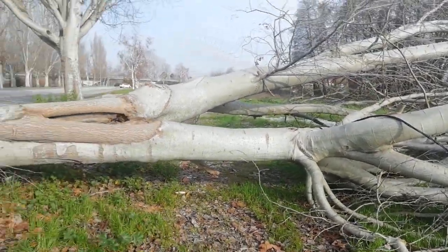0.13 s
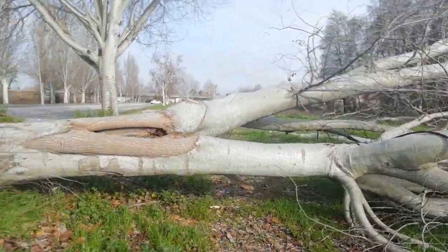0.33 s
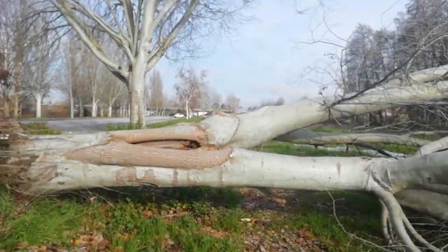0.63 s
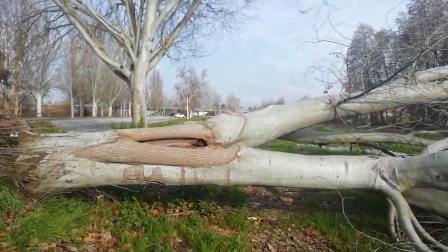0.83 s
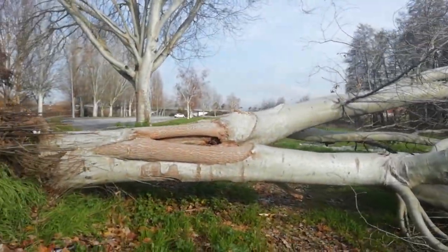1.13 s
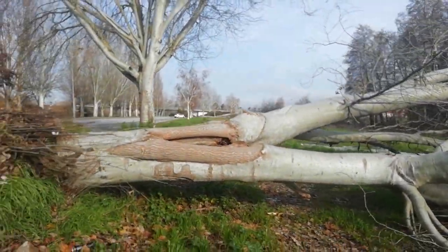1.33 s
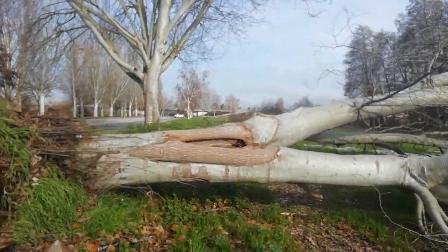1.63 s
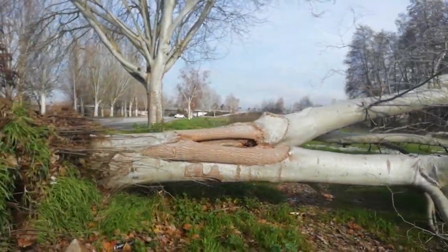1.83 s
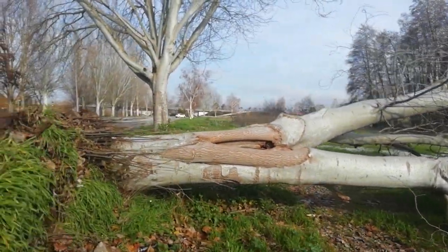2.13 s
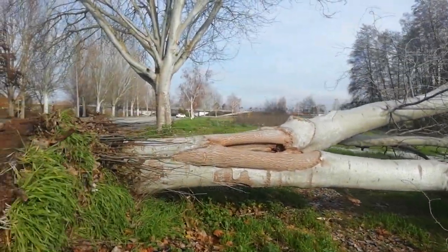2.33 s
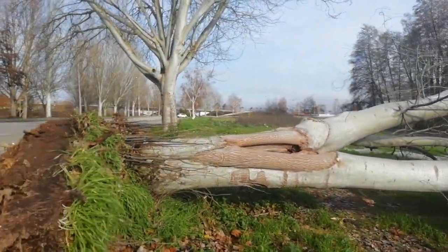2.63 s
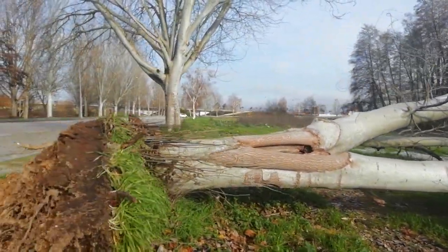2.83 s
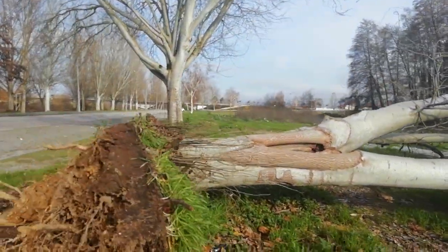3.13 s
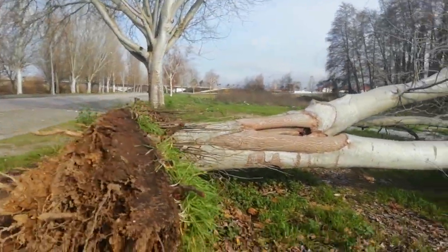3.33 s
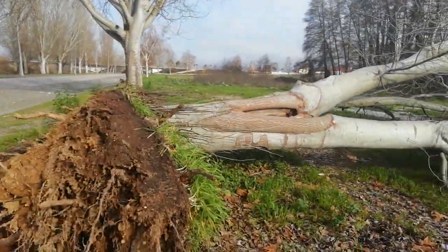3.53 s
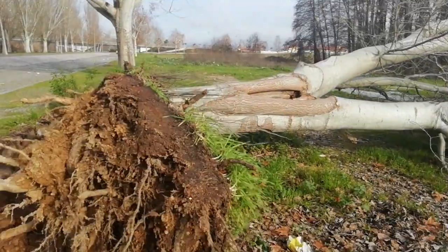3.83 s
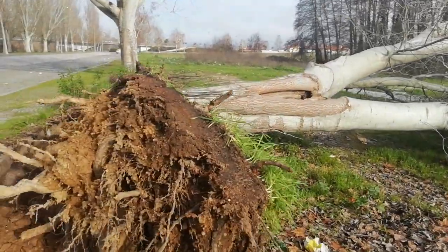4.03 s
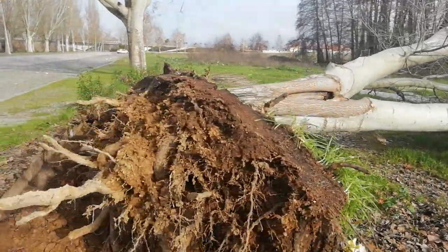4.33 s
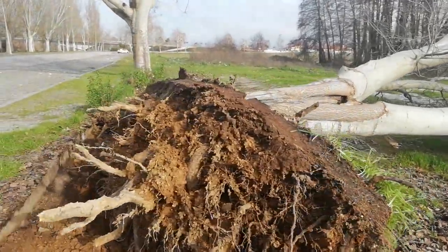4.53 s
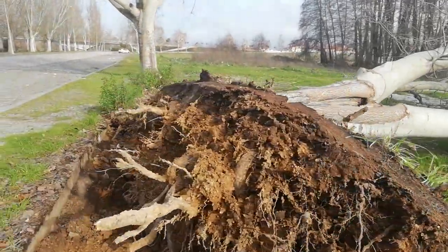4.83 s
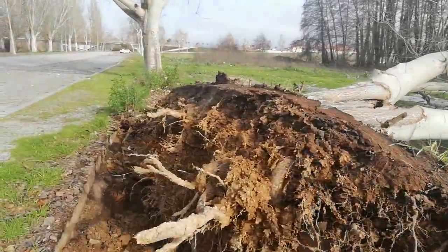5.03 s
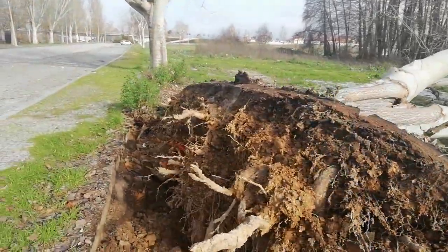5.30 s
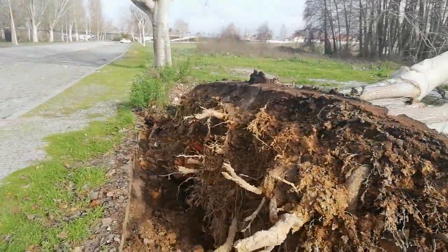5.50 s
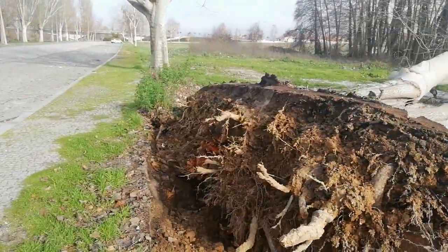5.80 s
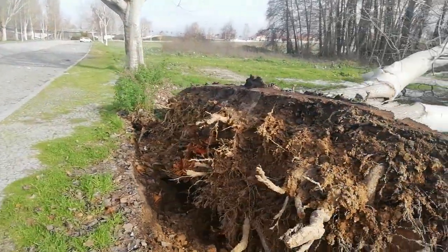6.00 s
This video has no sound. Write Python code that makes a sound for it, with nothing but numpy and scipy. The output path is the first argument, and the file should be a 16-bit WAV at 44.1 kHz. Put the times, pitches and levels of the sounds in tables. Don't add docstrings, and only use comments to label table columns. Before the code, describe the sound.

Close, crisp footsteps crackle through leaf litter and small twigs, growing stronger, over a quiet open background of thin leaf hiss and far traffic.

```python
import sys
import numpy as np
from scipy import signal
from scipy.io import wavfile
from scipy.ndimage import uniform_filter1d

SR = 44100
rng = np.random.default_rng(int(sys.argv[2]) if len(sys.argv) > 2 else 0)


def ratio_of_db(decibels):
    return 10 ** (np.asarray(decibels, float) / 20)


def unload_audio(sound):
    columns = np.transpose(np.atleast_2d(sound))
    steps = np.round(np.clip(columns, -1, 1) * 32767)
    wavfile.write(sys.argv[1], SR, steps.astype(np.int16))


N = 271656
COARSE_S = np.arange(0, N + 20, 20) / SR


def crunch(per_s=7000, spread_db=3.6, clump_db=1.0):
    leaf_db, stem_db, grit_db = tread()
    soil_db, pan_db = heels()
    born = rng.random(N) < per_s / SR
    size_db = spread_db * np.minimum(rng.exponential(1, N), 2.8) + clump_db * drift(40)
    size_db -= 20 * np.log10(np.sqrt(np.mean(born * ratio_of_db(size_db) ** 2)))
    at = np.flatnonzero(born)
    zone_db = [(level_db + size_db - 3.0)[at] for level_db in (soil_db, grit_db, stem_db, leaf_db)]
    return breaks(at, zone_db, pan_db[at], colour_db=4.0, scatter=1.1, patch_db=2.5)


# (peak time [s], leaf crackle level [dB], rise [s], fall [s], grit above the leaves [dB])
PRESSES = [(0.176, -38, .008, 0.3, -7.5), (0.23, -43, 0.085, 0.092, -6),
           (1.103, -29.5, 0.068, 0.091, -11.5), (1.852, -47.5, 0.013, 0.23, 11),
           (1.905, -34.5, 0.073, 0.1, -12), (1.954, -35, 0.025, 0.26, -13.5),
           (2.754, -35.5, 0.044, 0.14, -9.5), (2.793, -33, 0.032, 0.045, -5),
           (2.862, -32, 0.022, 0.073, -9.5), (2.934, -36, 0.021, 0.13, -15),
           (3.538, -33.5, 0.085, 0.066, -9.5), (4.2, -29.5, 0.034, 0.12, -12.5),
           (4.214, -26.5, 0.028, 0.078, -23.5), (4.813, -29, .017, 0.054, -12.5),
           (4.925, -25, 0.052, 0.074, -5.5), (5.557, -29, 0.014, 0.14, -8.5)]
# (peak time [s], leaf crackle level [dB], rise [s], fall [s], grit above the leaves [dB])
SCUFFS = [(0.34, -77, .03, 0.37, -22), (1.44, -35.5, 0.046, 0.27, -15.5), (1.51, -48, 0.12, 0.098, -13),
          (1.781, -44.5, 0.036, 0.056, -12.5), (2.262, -42.5, 0.23, 0.096, -9.5),
          (2.544, -52, .01, 0.14, -25), (2.592, -45.5, 0.016, 0.47, -16), (3.391, -46.5, 0.008, 0.083, -12),
          (3.48, -51, 0.04, 0.11, 6.5), (3.627, -43.5, 0.046, 0.067, -10), (3.763, -49, 0.14, 0.055, -11.5),
          (4.102, -60, 0.032, 0.17, 1.5), (4.579, -35, 0.012, 0.07, -26), (4.633, -31, 0.029, 0.02, -12),
          (4.669, -45.5, 0.045, 0.062, -7.5), (4.764, -44.5, 0.0071, 0.017, -4),
          (5.184, -39, 0.086, 0.014, -12), (5.256, -47, 0.0041, 0.015, -39),
          (5.93, -42, 0.049, 0.031, -13.5), (6.052, -53, 0.22, 0.1, -9)]
# (start [s], stop [s], last level [dB], swell [dB], grit above the leaves [dB])
DRAGS = [(0.0, 0.144, -66.5, -8, -4), (0.503, 0.684, -54, 12, -8), (1.228, 1.413, -54, -11.5, -12),
         (1.675, 1.829, -56, 0, -23), (1.99, 2.082, -41.5, -0.5, -16.5), (2.374, 2.52, -59.5, -4, -8.5),
         (2.966, 3.065, -45, -10, -16.5), (3.09, 3.178, -47, 0.5, -15), (3.2, 3.377, -62, -8, -8),
         (5.01, 5.11, -45, -1.5, -10.5), (4.323, 4.504, -42.5, -0.5, -14.5), (4.525, 4.552, -59, 2, -15),
         (5.289, 5.508, -56, 1, -9), (5.693, 5.807, -41, 6, -6), (5.82, 5.901, -48.5, -9, -13)]
DRAG_EDGE_S = 0.021
REST_DB, REST_GRIT_DB = -71.5, 4
STEM_DB, STEM_FOLLOWS_GRIT, STEM_FOLLOWS_LEAF = -7, 0.29, 0.012


def tread():
    t = COARSE_S
    moves = []
    for s, level_db, rise_s, fall_s, grit_db in PRESSES + SCUFFS:
        moves.append((peak(s, level_db, rise_s, fall_s), level_db, grit_db))
    for start, stop, last_db, swell_db, grit_db in DRAGS:
        edges = np.minimum(0, 20 * np.minimum(t - start, stop - t) / DRAG_EDGE_S)
        slope = np.interp(t, [start, stop], [last_db - swell_db, last_db])
        moves.append((slope + edges, last_db, grit_db))
    moves.append((np.full(len(t), REST_DB), REST_DB, REST_GRIT_DB))

    power = np.zeros((3, len(t)))
    for leaf_db, top_db, grit_db in moves:
        stem_db = STEM_DB + STEM_FOLLOWS_GRIT * (grit_db + 8.5) + STEM_FOLLOWS_LEAF * (top_db + 28)
        power += ratio_of_db(2 * leaf_db) * ratio_of_db([[0], [2 * stem_db], [2 * grit_db]])
    return [power_db(zone) for zone in power]


# (time [s], soil level [dB], fall [s], left-right at landing [dB], left-right at lift-off [dB])
HEELS = [
    (0.22, -64, 0.25, 5.5, 3),
    (1.07, -60, 0.43, 5, -1),
    (1.879, -49, 0.29, 2.5, 6),
    (2.24, -59.5, 0.081, -9, 2),
    (2.8, -59.5, 0.6, 3.5, -7.5),
    (3.53, -47, 0.14, 6.5, -2),
    (4.24, -53, 0.36, 4.5, -10),
    (4.64, -53.5, 0.14, -5.5, 4),
    (4.92, -46.5, 0.14, 6, -3.5),
    (5.6, -59.5, 0.98, 4, -13.5),
]
HEEL_RISE_S, LIFT_AFTER_S, REST_SOIL_DB = 0.11, 0.36, -64


def heels():
    power = ratio_of_db(2 * REST_SOIL_DB)
    sway = []
    for s, soil_db, fall_s, land_db, lift_db in HEELS:
        power = power + ratio_of_db(2 * peak(s, soil_db, HEEL_RISE_S, fall_s))
        sway += [(s, land_db), (s + LIFT_AFTER_S, lift_db)]
    sway.sort()
    return power_db(power), in_time(sway)


def peak(s, level_db, rise_s, fall_s):
    t = COARSE_S - s
    return level_db + 20 * np.minimum(t / max(rise_s, .002), -t / max(fall_s, .002))


def power_db(power):
    return np.interp(np.arange(N) / SR, COARSE_S, 10 * np.log10(power))


ZONES_HZ = [600, 1900, 3900, 7500]
# (frequency [Hz], level per Hz [dB])
LITTER = [(150, 19.5), (300, 11.5), (600, 10), (1200, 15.5), (2000, 11), (4000, 12), (6500, 5),
          (10000, -4.5), (15000, -13.5)]
# (frequency [Hz], share [0-1])
SAME_PATH = [(300, 0.99), (1500, 0.61), (4000, 0.69), (8000, 0.05)]
# (frequency [Hz], left-right [dB])
SHADOW = [(300, -0.5), (1200, 0), (4000, -4.5), (8000, -2.5), (13000, -7)]


def breaks(at, zone_db, pan_db, colour_db, scatter, patch_db, whole=False):
    where = arrival(at)
    side = np.array([[1], [-1]]) / 2
    out = np.zeros((2, N))
    for band, (hz, sos) in enumerate(bands(150, 14, 1 / 2)):
        place = np.interp(np.log(hz), np.log(ZONES_HZ), [0, 1, 2, 3])
        level_db = sum(max(0, 1 - abs(place - k)) * zone_db[k] for k in range(4))
        level_db = level_db + patch_db * drift(14.6)[at]
        draw = rng.standard_normal((len(at), 5)).T
        left_right_db = pan_db * place / 3 + at_hz(SHADOW, hz)
        size = ratio_of_db(level_db + at_hz(LITTER, hz) + colour_db * draw[0] + side * left_right_db)
        sign = (-1) ** band if whole else np.sign(draw[1])
        apart = np.clip(scatter * (1 - at_hz(SAME_PATH, hz)), 0, 1)
        strength = size * (np.sqrt(1 - apart) * sign + np.sqrt(apart) * draw[2:4])
        late = 0 if whole else (np.abs(draw[4]) * .0004 * SR).astype(int)
        clicks = [np.bincount(np.minimum(w + late, N - 1), s, N) for w, s in zip(where, strength)]
        out += signal.sosfilt(sos, np.array(clicks) + 1e-18)
    return out


# (from time [s], delay of the left port [samples])
FOOT = [
    (0, -4),
    (1.3, 4),
    (1.75, -4),
    (2.5, 5),
    (3.35, -4),
    (4.3, 6),
    (4.75, -5),
    (5.68, 6),
]


def arrival(at):
    foot = np.array(FOOT)
    step = np.searchsorted(foot[:, 0] * SR, at, "right") - 1
    lag = foot[step, 1].astype(int)
    return np.clip([at + lag, at], 0, N - 1)


def snaps(rows, tear_s=.0011, fade_db=1.5):
    s, peak_db, pan_db = np.repeat(rows, 4, axis=0).T
    order = np.tile(np.arange(4), len(s) // 4)
    s = s + tear_s * rng.random(len(s)) * order
    peak_db = peak_db - 1.5 - (order > 0) * 2.0 - fade_db * order
    zone_db = [peak_db - 20.0, peak_db - 21.0, peak_db - 12.5, peak_db + 2.0]
    return breaks((s * SR).astype(int), zone_db, pan_db, colour_db=1.5, scatter=.08, patch_db=0, whole=True)


# (time [s], peak level [dB], left-right [dB])
PLANT_SNAPS = [(0.1715, -18, 7), (0.2314, -18, 2), (0.2404, -15.5, 5), (0.2874, -18.5, 11), (0.3037, -20, -5),
               (1.041, -21, 9), (1.4283, -24, -11), (1.4916, -21, 1), (1.9094, -32, 1), (1.9546, -16, 5),
               (1.9982, -13.5, 8), (2.0663, -19.5, 7), (2.7423, -19, 8), (2.7812, -20, 7), (2.7927, -15, 4),
               (2.855, -21, -7), (2.861, -25, 10), (2.879, -18, 17), (2.9329, -19, -22), (2.9708, -22.5, -23),
               (3.527, -25, 1), (3.5395, -18.5, 27.5), (4.1847, -19, 4), (4.2002, -14, 3), (4.6337, -16, 13),
               (4.8098, -19, 5), (4.9056, -16, -12), (4.929, -20, 22), (4.9769, -19, -13), (5.1809, -25, -16),
               (0.0167, -39.5, -14), (0.083, -29, -8), (0.323, -26, 4), (0.3532, -30, 18), (0.4424, -32, 1),
         (1.6748, -32.5, -18), (2.247, -29, -15), (2.376, -32, 3), (2.546, -30, 16), (2.576, -31, -13),
         (2.5901, -20.5, 14), (2.7138, -18, 4), (3.055, -26, 8), (3.0968, -21, 9), (3.1397, -25.5, 17),
         (3.17, -27, -4), (3.2259, -31, -11), (3.3953, -29.5, -5), (4.106, -30.5, -12), (4.1345, -29.5, -4),
         (4.3195, -27, 11), (4.3398, -23, 8), (4.3943, -15, 20), (4.4084, -24, -30), (4.5785, -23, -19),
         (4.608, -21, -8), (4.7658, -22.5, -2), (5.2563, -19.5, 7), (5.919, -27, -16), (6.0011, -37, -11),
               (0.0667, -56, -18), (0.192, -24, 9), (0.2694, -31, 7), (0.394, -39, 7), (0.4843, -33.5, 9),
          (1.063, -25, 1), (1.2156, -32, -1), (1.3085, -25, -1), (1.5412, -26, -14), (1.776, -37, 2),
          (1.8694, -22, 5), (1.8964, -30, 7), (2.222, -33, -12), (2.482, -32.5, 8), (2.5623, -30, -4),
          (2.6114, -45, -2.1), (2.6934, -31, -2.5), (3.4754, -29, 5), (3.5665, -18.5, -3), (3.758, -28, 2),
          (3.96, -44, 3), (4.369, -29, 10), (4.4962, -22, -13), (4.6214, -30, .1), (4.8271, -13, 7),
          (5.08, -33, -6), (5.217, -30, -4), (5.3154, -35, -22), (5.7222, -27, 6), (5.9344, -30, -14),
               (0.0924, -50, -1.5), (0.2074, -20, 3.5), (0.2182, -21, 1.0), (0.2226, -19.5, 4),
         (0.2544, -23, 1.0), (1.0236, -36, 3.5), (1.0737, -23, 3.5), (1.0884, -29, 2.0), (1.4282, -34, 0),
         (1.4584, -19, 2), (1.5024, -25, -3.5), (1.5223, -30, -9), (1.5474, -28, -8), (1.5924, -31, -11),
         (1.8492, -38, 0.0), (1.9234, -33, 0.5), (2.0744, -30, 3), (2.162, -37, -2.5), (2.745, -22, -1.0),
         (2.7514, -23, -3), (2.8366, -27, 2), (2.9087, -27, -8), (3.2144, -35, 1), (3.509, -29, 4.5),
         (3.59, -30, 0.0), (4.179, -22, -4), (4.5705, -24, -6), (4.592, -27, -8.0), (4.666, -32, -3.5),
         (4.806, -27, 3.0), (4.8094, -13.5, 1.5), (4.8175, -12.5, 4), (4.883, -25, 0.5),
         (5.1055, -40, -4.5), (5.1447, -44, -11), (5.55, -17, 6), (5.5618, -18, 2), (5.5744, -22, -1.0),
         (5.6241, -22, -2.0), (5.6885, -33, 1), (5.7622, -38, -6), (5.782, -32, -5)]


def twigs_and_husks():
    return snaps(PLANT_SNAPS)


# (time [s], peak level [dB], left-right [dB])
STALKS = [(2.5172, -44, 0.0), (2.5462, -30, -2), (2.5524, -32, -2.0), (2.5624, -34, -2.5),
          (2.59, -25, -0.5), (2.651, -32, -3.0), (2.6704, -33, -3.5), (2.714, -28, -3.0),
          (2.7815, -17, -0.5), (2.855, -15, 1.0), (2.9483, -25, -3), (3.7984, -51, -3.5),
          (3.912, -42, -5.0), (3.9694, -48, 1.5), (4.0048, -41, -0.5), (4.1154, -37, -1.5),
          (4.2794, -24, -1.0), (4.4144, -28, -4.0), (5.2562, -25, 0.5), (5.3605, -32, -2.5),
          (5.4246, -47, 1), (5.5099, -49, -3.5)]


def stalks():
    return ratio_of_db(-3.0) * signal.lfilter([1, -2, 1], [1], snaps(STALKS, tear_s=.0003, fade_db=3.0))


# (time [s], peak level [dB], ring [Hz])
KNOCKS = [(0.172, -44, 1950), (0.193, -43, 1820), (0.324, -29.5, 2710), (1.841, -39, 1900),
          (1.8536, -29.5, 2070), (1.869, -29.5, 2880), (0.084, -46.5, 2720), (1.886, -33, 3200),
          (2.377, -40, 3640), (2.7926, -44, 4500), (2.7934, -29.5, 2600), (2.931, -40, 3200),
          (3.0512, -37, 3280), (3.098, -34, 3100), (3.124, -50, 2900), (3.166, -44, 2740),
          (3.216, -44, 3240), (3.228, -45, 3180), (3.3945, -38, 3400), (4.172, -39, 3170),
          (4.2017, -43, 3760), (4.577, -39, 4400), (4.58, -29, 4380), (4.807, -39, 1590),
          (4.8098, -35.5, 1920), (4.882, -46, 3340), (4.9052, -26, 3330), (5.5543, -41, 2000),
          (5.92, -34, 4130)]


def knocks(cycles=7.0):
    out = np.zeros((2, N + 800))
    t = np.arange(800) / SR
    starts = arrival((np.array(KNOCKS)[:, 0] * SR).astype(int)).T
    for (s, peak_db, hz), (left, right) in zip(KNOCKS, starts):
        modes = np.sin(2 * np.pi * hz * t) + 0.39 * np.sin(2 * np.pi * 1.184 * hz * t)
        onset = np.minimum(t * hz, 1)
        ring = ratio_of_db(peak_db + 14.5 - 60 * t * hz / cycles / 2) * modes * onset
        out[0, left:left + len(t)] += ratio_of_db(-5.5) * ring
        out[1, right:right + len(t)] += ring
    return out[:, :N]


# (start [s], stop [s], first pitch [Hz], last pitch [Hz], level [dB])
GRINDS = [(.19, .27, 3300, 3000, -43.5), (1.07, 1.103, 3100, 3230, -43), (1.438, 1.469, 3200, 3440, -43),
          (1.489, 1.51, 3100, 2960, -41.5), (1.514, 1.552, 3200, 2900, -48.5),
          (1.72, 1.771, 2400, 2570, -53), (1.853, 1.889, 2300, 2690, -38),
          (1.891, 1.927, 2500, 2210, -37.5), (3.045, 3.075, 3200, 3220, -44.5),
          (3.101, 3.185, 3100, 3080, -49), (3.2, 3.246, 3200, 3170, -56), (4.562, 4.602, 4400, 4200, -43),
          (4.6, 4.645, 3900, 1800, -44), (4.166, 4.25, 4340, 3760, -54), (1.846, 1.962, 1000, 802, -52.5),
          (4.9, 4.971, 1500, 1408, -46), (1.86, 1.981, 502, 401, -54), (4.65, 4.679, 2500, 3600, -46),
          (4.699, 4.76, 3400, 3370, -58), (5.548, 5.608, 2000, 2300, -41), (5.838, 5.869, 3700, 3590, -40),
          (5.907, 5.944, 4100, 3860, -46)]
GRIND_WIDTH, GRIND_EDGE_S, GRIND_LEFT_DB = 0.23, 0.0037, -11.5


def grinds(per_s=2500, spread_db=4.0):
    out = np.zeros((2, N + 64))
    slipping = rng.random(N) < per_s / SR
    slip_size = ratio_of_db(spread_db * np.minimum(rng.exponential(1, N), 3))
    slips = slipping * rng.choice([-1, 1], N) * slip_size
    for start, stop, first_hz, last_hz, level_db in GRINDS:
        first, last = int(start * SR), int(stop * SR)
        t = np.arange(last - first) / SR
        wide_hz = np.clip(GRIND_WIDTH * (first_hz + last_hz) / 4, 50, 2000)
        rough = signal.sosfilt(signal.butter(2, wide_hz, fs=SR, output="sos"), slips[first:last])
        carrier = np.sin(2 * np.pi * np.cumsum(np.geomspace(first_hz, last_hz, len(t))) / SR)
        edge = np.minimum(1, np.minimum(t, t[::-1]) / GRIND_EDGE_S)
        sound = ratio_of_db(level_db) * edge * rms_one(rough * carrier)
        left, right = arrival(np.array([first]))[:, 0]
        out[0, left:left + len(t)] += ratio_of_db(GRIND_LEFT_DB) * sound
        out[1, right:right + len(t)] += sound
    return out[:, :N]


# (time [s], pitch [Hz], level [dB])
CHIPS = [
    [(.915, 8100, -78), (.93, 8000, -65), (.955, 8050, -84), (.965, 7800, -80), (.98, 7100, -78)],
    [(1.345, 6800, -47), (1.355, 7600, -42), (1.366, 8000, -39.5), (1.373, 7400, -48), (1.383, 6500, -43),
     (1.397, 7100, -44), (1.408, 7100, -66)],
    [(3.834, 6700, -74), (3.843, 8100, -50), (3.852, 8750, -48), (3.858, 8000, -52), (3.865, 7200, -45),
     (3.873, 7600, -64), (3.881, 8000, -42.5), (3.89, 7500, -60), (3.9, 7800, -73)],
]


def bird():
    call, t = np.zeros(N), np.arange(N) / SR
    for rows in CHIPS:
        s, hz, level_db = np.transpose(rows)
        sounding = (t > s[0]) & (t < s[-1])
        pitch = uniform_filter1d(np.interp(t, s, hz), size=220)
        call += sounding * ratio_of_db(np.interp(t, s, level_db)) * np.sin(2 * np.pi * np.cumsum(pitch) / SR)
    trees = rng.standard_normal((2, 12000)) * ratio_of_db(-60 * np.arange(12000) / SR / .2)
    echo = np.array([signal.fftconvolve(call, r)[:N] for r in trees])
    return call * ratio_of_db([[-12], [-3]]) + ratio_of_db(-38) * echo


# (frequency [Hz], level per Hz [dB])
LEAF_HISS = [(2500, -4.5), (4500, -11), (7000, -9.5), (10000, -18.5), (15500, -10)]


def far_leaves():
    return ratio_of_db(-70.0) * banded_noise(LEAF_HISS, patchy_db=2.5)


# (frequency [Hz], level per Hz [dB])
ROAD = [(15, -42), (25, -8.5), (53, 4.5), (155, -9), (197, -16), (240, -9), (261, -22), (403, -23.5),
        (547, -8.5), (665, -17), (941, -12), (1200, -21.5), (1420, -22.5), (4500, -56), (5850, -65),
        (9900, -120)]
# (time [s], level [dB])
ROAD_SWELL = [(0.0, -59), (1.17, -61), (1.51, -56), (2.42, -57), (2.74, -54), (3.26, -58), (3.74, -57),
              (3.89, -60), (4.8, -55), (6.16, -58)]


def road():
    return ratio_of_db(in_time(ROAD_SWELL) + 4.05) * banded_noise(ROAD, patchy_db=2.0)


# (frequency [Hz], left-right likeness)
LIKENESS = [(60, 1.0), (130, 1), (290, 0.015), (640, -1.36), (1410, 0.88), (3100, 0.74), (6820, 0.2),
            (15000, -0.093)]


def banded_noise(spectrum, patchy_db):
    out, white = 0, rng.standard_normal((2, 2, N))
    for k, (hz, sos) in enumerate(bands(22, 29, 1 / 3)):
        if spectrum[0][0] <= hz <= spectrum[-1][0]:
            mid, side = signal.sosfilt(sos, white[k % 2])
            alike = np.clip(at_hz(LIKENESS, hz), -.99, .995)
            gain = ratio_of_db(at_hz(spectrum, hz) + patchy_db * drift(4.7))
            out = out + gain * (np.sqrt(1 + alike) * mid + np.sqrt(1 - alike) * side * [[1], [-1]])
    return rms_one(out)


def bands(low_hz, count, step):
    edges = low_hz * 2 ** (np.arange(count + 1) * step)
    bank = []
    for a, b in zip(edges, edges[1:]):
        bank.append((np.sqrt(a * b), signal.butter(2, [a, b], "band", fs=SR, output="sos")))
    return bank


def drift(rate):
    r = np.exp(-80 * np.pi * rate / SR)
    slow = signal.lfilter([1], [1, -2 * r, r * r], rng.standard_normal(N // 40 + 2002))[2000:]
    return np.interp(np.arange(N) / 40, np.arange(len(slow)), rms_one(slow))


def rms_one(x):
    return x / np.sqrt(np.mean(x ** 2) + 1e-20)


def in_time(rows):
    s, value = np.transpose(rows)
    return np.interp(np.arange(N) / SR, s, value)


def at_hz(points, hz):
    table_hz, value = np.transpose(points)
    return np.interp(np.log(hz), np.log(table_hz), value)


def scene():
    steps = crunch() + twigs_and_husks() + stalks() + knocks() + grinds()
    return steps + bird() + far_leaves() + road()


def roll_off(x):
    return signal.sosfilt(signal.butter(12, 16690, fs=SR, output="sos"), x)


# (frequency [Hz], width [Hz], lift [dB])
PORTS = [(8860, 1130, 14), (7870, 945, 12.5)]
CUTOFF_HZ = 16400


def record(dry):
    heard = []
    for x, (hz, width_hz, lift_db) in zip(dry, PORTS):
        r = np.exp(-np.pi * width_hz / SR)
        poles = [1, -2 * r * np.cos(2 * np.pi * hz / SR), r * r]
        ring = signal.lfilter([(1 - r * r) / 2, 0, (r * r - 1) / 2], poles, x)
        heard.append(x + (ratio_of_db(lift_db) - 1) * ring)
    rounded = .4 * np.tanh(np.array(heard) / .4)
    mix = signal.sosfilt(signal.cheby2(12, 60, CUTOFF_HZ, fs=SR, output="sos"), rounded)
    return roll_off(mix)


dry = scene()
out = record(dry)
unload_audio(out)
```